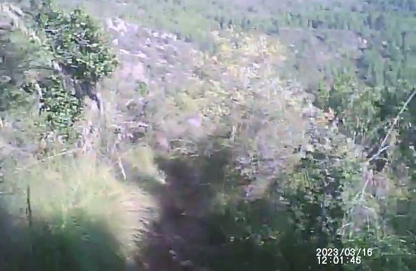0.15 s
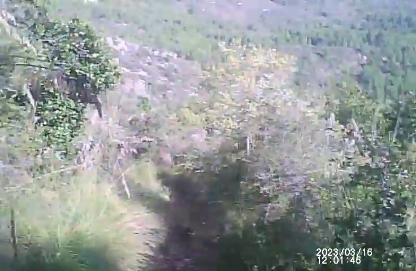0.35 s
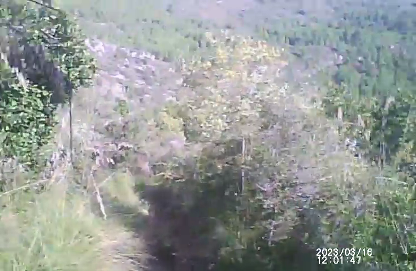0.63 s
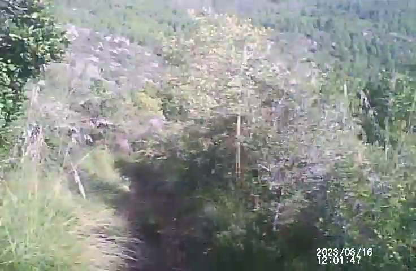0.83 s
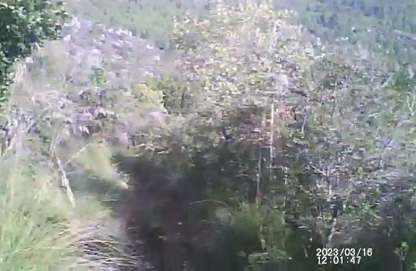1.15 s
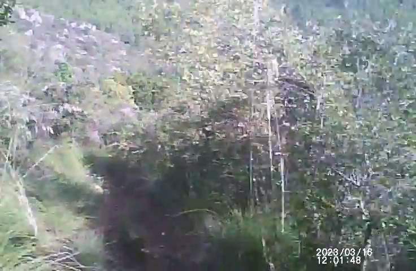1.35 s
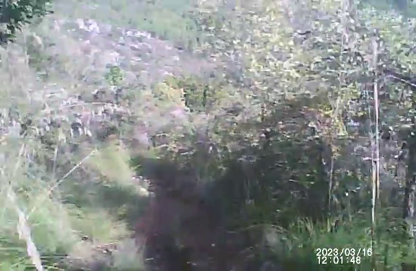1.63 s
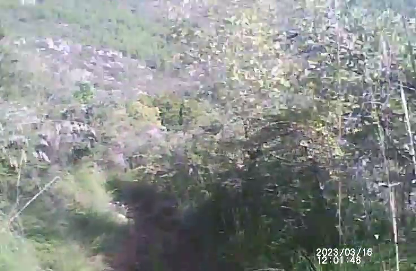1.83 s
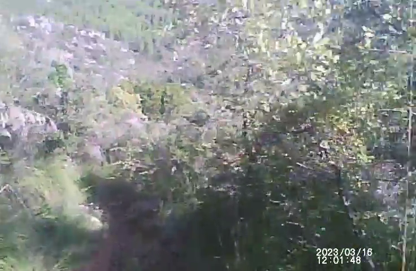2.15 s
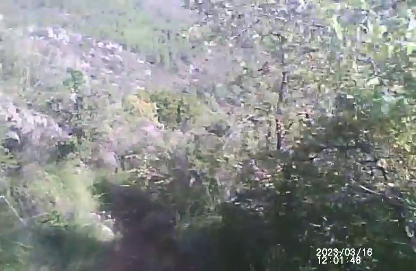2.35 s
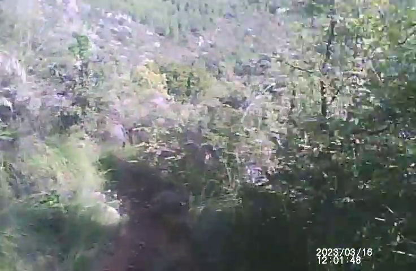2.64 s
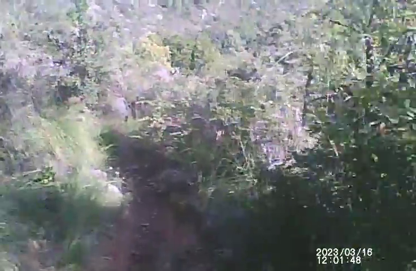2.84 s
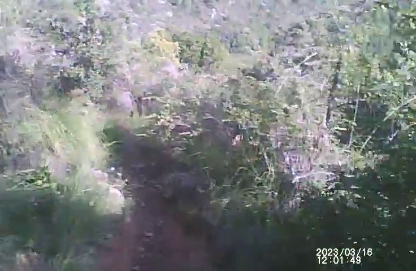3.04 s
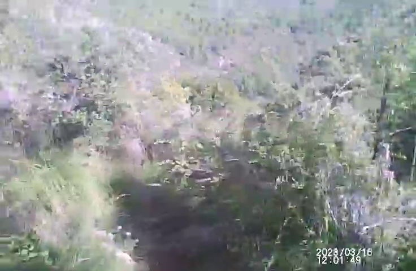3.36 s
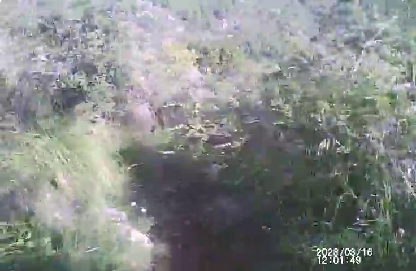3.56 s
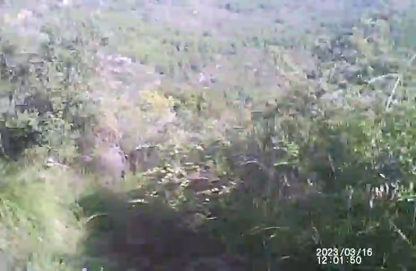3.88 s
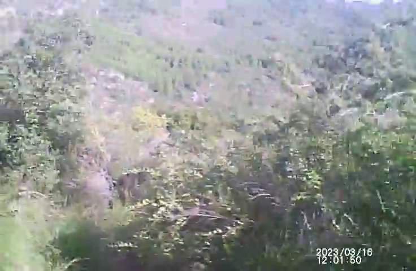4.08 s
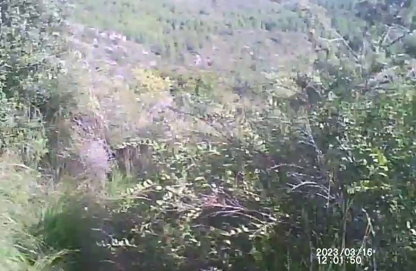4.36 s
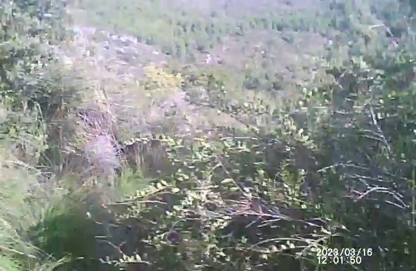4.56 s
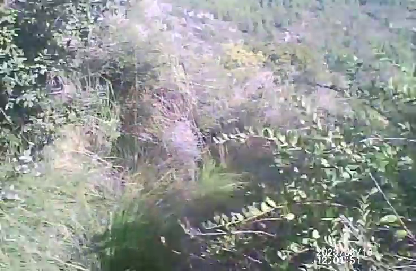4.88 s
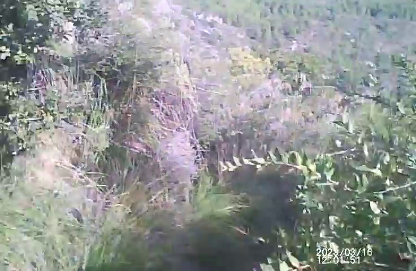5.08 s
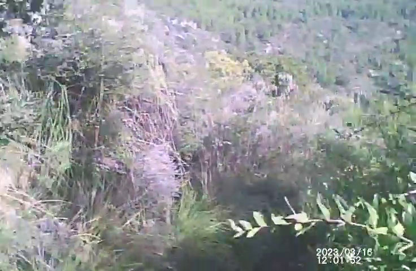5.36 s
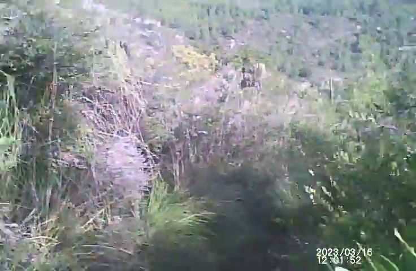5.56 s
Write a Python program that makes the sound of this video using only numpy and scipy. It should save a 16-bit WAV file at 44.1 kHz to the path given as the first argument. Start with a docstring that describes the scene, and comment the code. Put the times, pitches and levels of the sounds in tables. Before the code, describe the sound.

A mountain bike descends a rocky dirt path through bushes, heard through a small, overloaded mono microphone in a case. Throughout, low wind rumble surges in uneven fraction-of-a-second gusts, flattening into crackly distortion. From 0 to 1 s, thuddy air slaps, strongest near 0.4 s, cover faint grit rattle and light knocks. A hard bright snap hits at 1.2 s, then softer jolts run from 1.6 s, with a heavy double clack at 2.3 s. A strong gust swells around 2.8 s; at 3.1 s everything dips for an instant. From 3.3 s the ground roughens: tyre crunch rises, a sharp crack lands at 3.6 s, and hollow and bright knocks crowd together until about 4.5 s amid fuller, harsher wind. It eases after 4.6 s, with isolated clacks at 4.9 and 5.2 s. Wind sinks near 5.4 s, leaving small slaps, weak ticks and faint hollow case hum to the end.

```python
"""Wind tumbles over a microphone port in a lumpy rumble while a mountain bike rides down a rocky dirt trail.
Wind is shaped noise with slow random level swings; slaps of air are short, low, damped swings.
Jolts are bursts of random contacts that ring resonances of frame and camera case; tyres and loose parts
are dense random clicks. A narrow-band converter overloads and cuts the sum into flat tops."""
import sys
import numpy as np
from scipy import signal
from scipy.fft import rfft, irfft, next_fast_len
from scipy.io import wavfile
from scipy.ndimage import uniform_filter1d

SR = 44100
rng = np.random.default_rng(int(sys.argv[2]) if len(sys.argv) > 2 else 0)


def unload_wav(signal):
    """Save mono or channel-first audio to the path in sys.argv[1] as 16-bit WAV at rate SR, clipped to [-1, 1]."""
    wavfile.write(
        sys.argv[1],
        SR,
        np.round(np.clip(np.atleast_2d(signal).T, -1, 1) * 32767).astype(np.int16),
    )


N = 251811

# Jolts of the frame: start_s, peak_db, pitch_hz, shake_length_s
JOLTS = [(0.167, -16.5, 2600, 0.011), (0.38, -10, 1470, 0.026), (0.556, -21.5, 920, 0.0063),
         (0.588, -2.5, 1420, 0.0054), (0.683, -16.5, 2660, 0.011), (0.852, -15, 2890, .008),
         (1.184, 7.5, 2900, 0.0057), (1.229, -9, 2800, 0.016), (1.271, -10, 1290, 0.013),
         (1.572, -17.5, 910, 0.01), (1.5908, -4, 880, 0.0096), (1.754, -12, 900, 0.0093),
         (1.846, -13.5, 1460, 0.011), (1.901, -4, 2670, 0.01), (1.979, -8, 1430, .006),
         (2.0798, -2.5, 886, 0.025), (2.204, -7.5, 1620, 0.0023), (2.3012, 10.5, 1170, 0.0086),
         (2.3104, 9.5, 2540, .004), (2.317, -8, 890, .011), (2.51, -12.5, 1470, .009),
         (2.644, -4, 1680, 0.011), (2.877, -12.5, 944, 0.0079), (2.925, -8.5, 1520, 0.018),
         (2.958, -8.5, 860, 0.008), (2.976, -8, 1680, 0.008), (3.1535, -8.5, 2820, 0.011),
         (3.18, -6.5, 1060, 0.0089), (3.2417, -5, 930, 0.019), (3.276, -10.5, 1120, .013),
         (3.305, -8, 2620, 0.009), (3.467, -1, 2560, 0.0095), (3.546, 0, 1870, 0.0099),
         (3.578, 2, 2980, .004), (3.636, 9.5, 1750, 0.0037), (3.752, 4, 2600, 0.01),
         (3.801, -3.5, 902, .006), (3.8274, -1, 1760, 0.015), (3.896, 4.5, 784, 0.008),
         (3.9644, -5.5, 980, 0.0063), (4.044, -3.5, 1080, 0.0074), (4.178, 1, 950, 0.016),
         (4.239, 6, 2760, 0.01), (4.264, 3, 1770, 0.0073), (4.308, -2, 940, 0.0097),
         (4.355, 3.5, 2500, 0.0096), (4.392, 3, 2200, 0.0028), (4.407, -2, 2750, .01),
         (4.429, 5.5, 970, 0.012), (4.47, 2.5, 870, 0.0065), (4.6036, -10, 950, 0.0085),
         (4.702, -14.5, 910, 0.0046), (4.7551, -10.5, 940, 0.0096), (4.913, 4, 2700, 0.0055),
         (5.034, -3, 1870, 0.0056), (5.162, -5, 1870, 0.0043), (5.185, 5.5, 2720, .003),
         (5.247, -4.5, 900, 0.011), (5.294, -13.5, 1680, 0.0087), (5.345, -17.5, 918, 0.0059),
         (5.514, -10, 1910, 0.0054)]
# Resonances of the camera case: centre_hz, width_hz, level_db
CASE_MODES = [(859, 64, 5), (1423, 260, -1.5), (1860, 220, -9.5), (2813, 132, 5), (3687, 82, -11.5)]


def wind(wind_db, edge_db):
    """Turbulence: eddies arrive in lumps, and the strongest lumps also tear with a brighter edge."""
    # Low wind noise: frequency_hz, density_db (per Hz)
    wind_spectrum = [(25, -41), (45, -38.5), (80, -13), (125, -3), (190, 0), (280, -4), (400, -11.5),
                     (700, -50), (1500, -57.5)]
    # Bright edge of the wind: frequency_hz, density_db (per Hz)
    edge_spectrum = [(200, -18), (380, 3), (550, -2), (800, -6), (1100, -23), (2500, -35.5)]
    # Pass band of the port: frequency_hz, gain_db
    port_response = [(30, -6.5), (70, 1), (450, -1), (900, -15)]

    lumps = drift(24.0)
    swirl = coloured(rng.standard_normal(N), wind_spectrum)
    # A jet over the port sustains its swing: the envelope is evened out.
    envelope = np.abs(signal.hilbert(swirl, next_fast_len(N))[:N])
    steady = swirl / (envelope + 0.36) ** 0.18
    rumble = coloured(steady, port_response) * from_db(1.9 * lumps)

    edge_swing_db = 3.57 * lumps + 2.5 * drift(51.0)
    edge = coloured(rng.standard_normal(N), edge_spectrum) * from_db(edge_swing_db)
    return from_db(wind_db) * (rms_one(rumble) + from_db(edge_db - 1.0) * rms_one(edge))


def gusts():
    """Flow unsteadiness: each gust rises, holds for its length and falls back, in dB above the breeze."""
    # Gusts: start_s, hold_length_s, rise_db (above the breeze)
    gust_table = [(0.22, 0.023, 4), (0.353, 0.2, 5), (0.805, 0.15, 7), (1.21, 0.091, 5), (1.495, 0.24, 5),
                  (1.767, 0.099, 5), (1.958, 0.28, 5), (2.372, 0.077, 6.5), (2.527, 0.02, 4.5),
                  (2.809, 0.16, 8.5), (3.102, 0.031, 4), (3.29, 0.13, 4), (3.573, 0.22, 3.5),
                  (3.968, 0.18, 4), (4.248, 0.051, 4), (4.615, 0.11, 2.5), (4.875, 0.11, 2)]
    rise_s, fall_s = 0.021, 0.04
    t = np.arange(N) / SR
    curves = []
    for start, length, db in gust_table:
        hold_start = start + rise_s
        hold_end = hold_start + length
        curves.append(np.interp(t, [start, hold_start, hold_end, hold_end + fall_s], [0, db, db, 0]))
    return np.max(curves, axis=0)


def slaps():
    """Damped oscillation: each sudden slap of air on the port is a few low swings that start fast and die."""
    # Slaps of air: start_s, level_db, pitch_hz
    slap_table = [(0.108, 3.5, 218), (0.164, -1.5, 300), (0.396, 4, 165), (0.446, 7.5, 223),
                  (0.553, -1.5, 155), (1.032, -5, 230), (1.377, -0.5, 177), (1.476, 2, 161),
                  (1.972, 3.5, 165), (2.02, 0, 196.5), (2.822, 3.5, 225), (3.114, -0.5, 250),
                  (3.192, 0, 148), (3.295, 4, 165), (4.819, -2, 166), (4.857, 4, 181), (5.114, -10, 189),
                  (5.252, -1, 223), (5.354, -1.5, 225), (5.446, 0.5, 140), (5.533, -4, 167)]
    out, t = np.zeros(N + SR), np.arange(SR // 20) / SR
    for start, db, hz in slap_table:
        turns = hz * t
        envelope = 1.6 * turns * np.exp(-1.1 * turns)
        out[round(start * SR):][:len(t)] += from_db(db) * envelope * np.sin(2 * np.pi * turns)
    return out[:N]


def knocks():
    """Impact excitation: a jolt snaps and chatters, ringing a pitch of its own and, more faintly, the case."""
    out, t = np.zeros(N + SR), np.arange(SR // 8) / SR
    shape = (len(JOLTS), len(t))
    chatter = rng.standard_normal(shape) * (rng.random(shape) < 0.12)   # sparse random contacts
    for (start, db, hz, length), touches in zip(JOLTS, chatter):
        shake = np.exp(-(t / length) ** 3.4) + 0.097 * np.exp(-t / 0.021)
        drive = touches * shake
        drive[0] += 4.0   # the first contact is one hard snap
        own_pitch = rms_one(resonate(drive, hz, 0.21 * hz))
        case_ring = from_db(-2.5) * rms_one(case(drive))
        # The hard contact itself, barely pitched.
        crack = from_db(-5.5) * rms_one(resonate(drive, 2000, 1800))
        ring = own_pitch + case_ring + crack
        out[round(start * SR):][:len(t)] += from_db(db) * ring / np.max(np.abs(ring))
    return out[:N]


def case(x):
    """Modal superposition: everything carried by the frame rings in the resonances of the camera case."""
    modes = []
    for k, (hz, width, db) in enumerate(CASE_MODES):
        sign = (-1) ** k   # neighbouring modes have opposite sign
        modes.append(sign * from_db(db) * resonate(x, hz, width))
    return sum(modes)


def stirred(ground_db):
    """Exponential relaxation: loose parts rattle louder just after each jolt, then settle."""
    shake_share, settle_s = 0.035, 0.02   # share of the jolt's height; decay time
    t = np.arange(N) / SR
    extra = np.zeros(N)
    for start, db, *_ in JOLTS:
        extra += from_db(db) * (t > start) * np.exp(-np.maximum(t - start, 0) / settle_s)
    return 20 * np.log10(from_db(ground_db) + shake_share * extra)


def rattle(rattle_db):
    """Random impulse trains: grit under the tyres, loose parts ticking in clumps, and a breathy case hum."""
    # Crunch of the grit: frequency_hz, density_db (per Hz)
    crunch_spectrum = [(300, -26.5), (600, -2), (1000, -7.5), (1500, -2.5), (2200, -0.5), (2900, -6),
                       (3300, -11.5), (3700, -11), (4300, -14)]
    hum_db = -5.5   # relative to the rattle level averaged over half a second

    clumps = drift(30.0)
    grit = coloured(grains(3000 * from_db(5.9 * clumps), spread_db=1.5), crunch_spectrum)
    ticks = rms_one(case(grains(500 * from_db(5.0 * clumps), spread_db=4.0)))

    # Airflow keeps the lowest case resonance humming.
    hz, width, _ = CASE_MODES[0]
    breath = resonate(rng.standard_normal(N), hz, 2.0 * width)
    hum = rms_one(resonate(breath, hz, 2.0 * width))
    steady_db = uniform_filter1d(rattle_db, size=SR // 2)
    return from_db(rattle_db) * (grit + from_db(-1.0) * ticks) + from_db(steady_db + hum_db) * hum


def grains(per_s, spread_db):
    """Poisson-like process: random clicks of uneven size and either sign."""
    size_db = spread_db * np.minimum(rng.exponential(1, N), 4)
    sizes = from_db(size_db) * rng.choice([-1, 1], N)
    return sizes * (rng.random(N) < per_s / SR) + 1e-18


def drift(rate):
    """Low-pass noise: a slow random curve of rms 1, smoothed by two equal poles at rate Hz."""
    r = np.exp(-2 * np.pi * rate / SR)
    noise = rng.standard_normal(N + SR)
    return rms_one(signal.lfilter([1], [1, -2 * r, r * r], noise)[SR:])   # drop the filter's first second


def resonate(x, hz, width):
    """Two-pole resonance: the pole radius sets the width in Hz; the gain at the top is about 1."""
    r = np.exp(-np.pi * width / SR)
    feedback = [1, -2 * r * np.cos(2 * np.pi * hz / SR), r * r]
    return signal.lfilter([(1 - r * r) / 2, 0, (r * r - 1) / 2], feedback, x)


def coloured(x, spectrum):
    """Spectral shaping: weight each frequency by a (Hz, dB) curve, straight in log frequency; rms 1."""
    hz, db = np.transpose(spectrum)
    size = next_fast_len(N)
    bins = np.maximum(np.arange(size // 2 + 1) * SR / size, 1)
    gain = from_db(np.interp(np.log(bins), np.log(hz), db, right=-90))
    return rms_one(irfft(rfft(x, size) * gain, size)[:N])


def from_db(db):
    """Decibel law: amplitude gain of a level."""
    return 10 ** (np.asarray(db) / 20)


def rms_one(x):
    """Power normalisation: scale to unit rms."""
    return x / np.sqrt(np.mean(x ** 2) + 1e-20)


def in_time(rows):
    """Linear interpolation: table columns as sample-rate curves."""
    s, *columns = np.transpose(rows)
    return [np.interp(np.arange(N) / SR, s, c) for c in columns]


def scene():
    """Superposition: wind, slaps, rattle and knocks add at one microphone; the sum drops out for a moment."""
    # Course of the ride: time_s, breeze_db (airflow between gusts), edge_db (bright edge relative to
    # the wind, before its trim and the changes below), ground_db (rattle from the rough ground)
    trail = [(0.0, -11, -8, -29), (0.32, -16.5, -12, -34), (0.62, -14, -10.5, -32.5),
             (0.8, -15, -13, -28.5), (1.15, -14, -12.5, -37.5), (1.43, -14.5, -14.5, -33),
             (1.75, -13.5, -11, -29.5), (1.9, -12.5, -13.5, -29.5), (2.1, -11.5, -7.5, -28),
             (2.5, -15, -12, -31.5), (2.75, -11, -15.5, -35), (3.07, -17, -14, -35),
             (3.3, -11.5, -10, -23.5), (3.52, -10, -7, -29.5), (3.75, -9.5, -12, -32),
             (3.95, -10, -1.5, -25), (4.12, -7.5, -5.5, -27), (4.3, -9.5, -9, -31), (4.44, -7.5, -3, -19.5),
             (4.6, -9.5, -9.5, -25), (4.79, -14, -8.5, -29), (5.04, -15, -5.5, -23),
             (5.2, -16.5, -6, -25.5), (5.4, -21, -13.5, -30.5), (5.71, -16, -12.5, -32)]
    edge_follows = 0.9   # share of a jolt's stir, in dB, that the bright edge follows
    gust_dulls = 0.22   # share of a gust's rise, in dB, that the bright edge misses
    dropout_start_s, dropout_end_s, dropout_db = 3.099, 3.115, -15   # every sound is cut at once

    breeze_db, edge_db, ground_db = in_time(trail)
    rattle_db, gust_db = stirred(ground_db), gusts()
    edge_db = edge_db + edge_follows * (rattle_db - ground_db) - gust_dulls * gust_db
    total = wind(breeze_db + gust_db, edge_db) + slaps() + rattle(rattle_db) + knocks()

    corners_s = [dropout_start_s - 0.002, dropout_start_s, dropout_end_s, dropout_end_s + 0.002]
    dropout = np.interp(np.arange(N) / SR, corners_s, [0, dropout_db, dropout_db, 0])
    return (from_db(dropout) * total)[None]


def record(dry):
    """Hard clipping: an 8 kHz converter overloads; its ripples clip again at full rate, spraying treble."""
    mic_band_hz, cutoff_hz = (55, 3700), 16400
    overload, playback_top = 0.67, 0.68   # clip heights, full scale = 1

    heard = signal.sosfilt(signal.butter(2, mic_band_hz, "band", fs=SR, output="sos"), dry)
    narrow = np.clip(signal.resample_poly(heard, 80, 441, axis=1), -overload, overload)   # at 8 kHz
    smooth = signal.firwin(24 * 441 + 1, 3880, window=("kaiser", 9), fs=441 * 8000)
    wide = signal.resample_poly(narrow, 441, 80, axis=1, window=smooth)[:, :N]
    wide = np.pad(wide, ((0, 0), (0, N - wide.shape[1])), "edge")
    wide = np.clip(wide, -playback_top, playback_top)
    return signal.sosfilt(signal.cheby2(12, 70, cutoff_hz, fs=SR, output="sos"), wide)


dry = scene()
out = record(dry)
unload_wav(out)
```